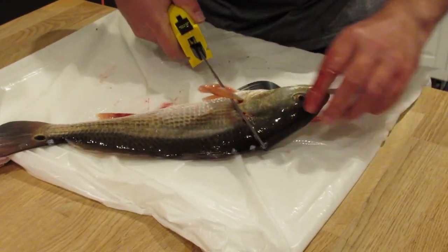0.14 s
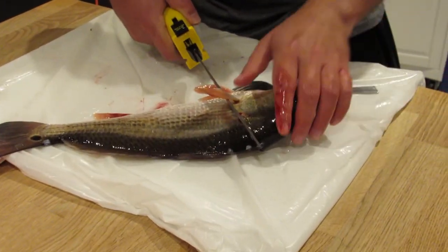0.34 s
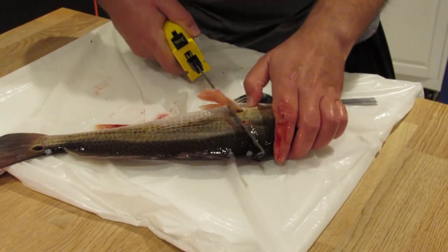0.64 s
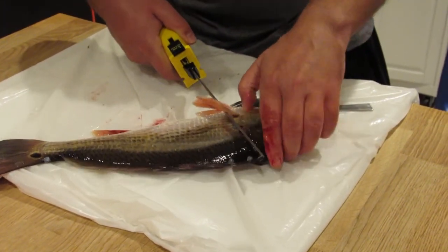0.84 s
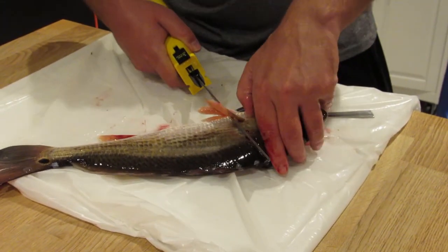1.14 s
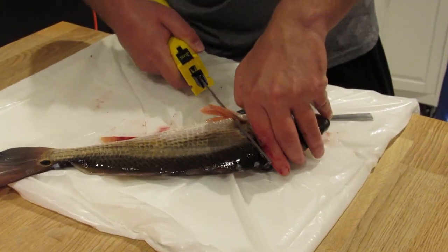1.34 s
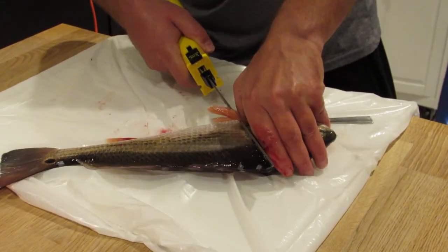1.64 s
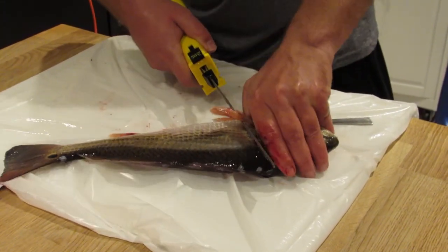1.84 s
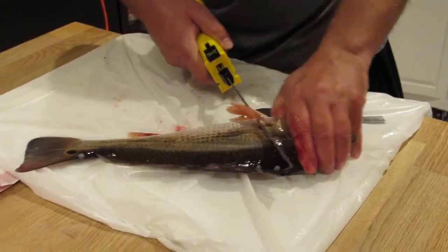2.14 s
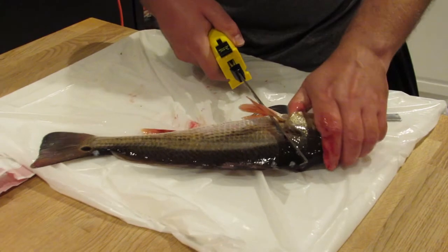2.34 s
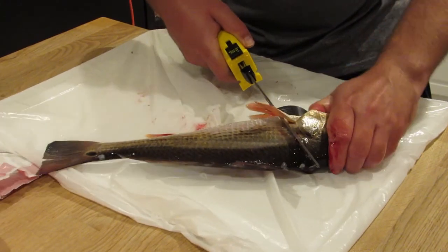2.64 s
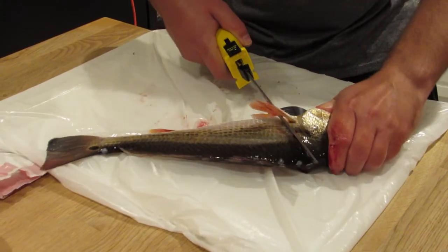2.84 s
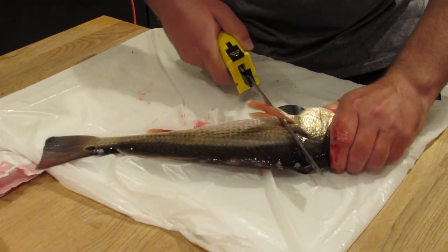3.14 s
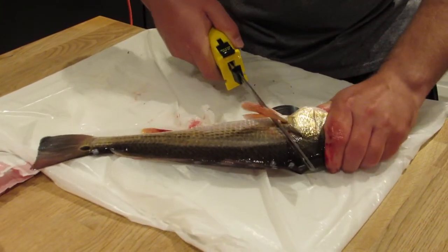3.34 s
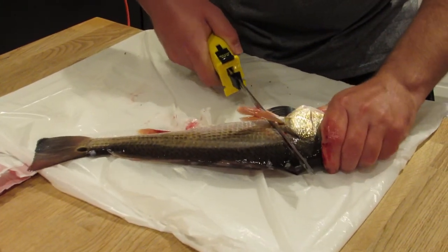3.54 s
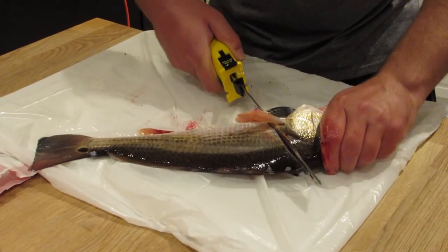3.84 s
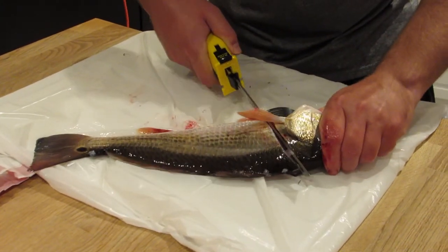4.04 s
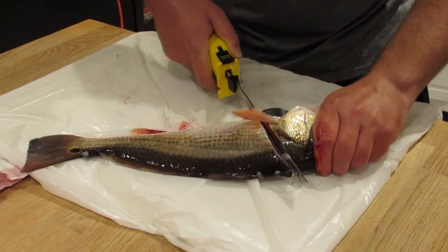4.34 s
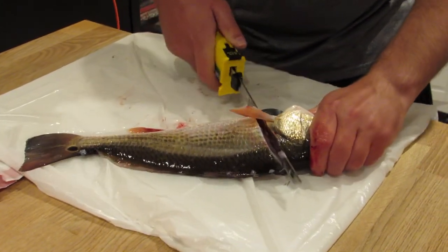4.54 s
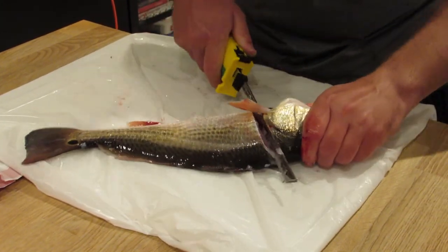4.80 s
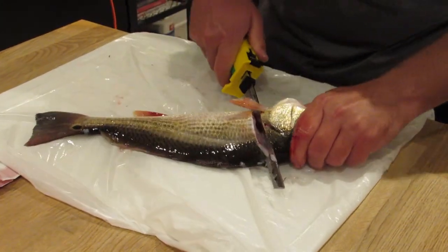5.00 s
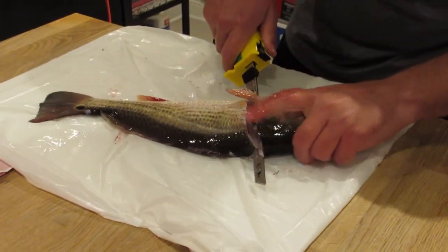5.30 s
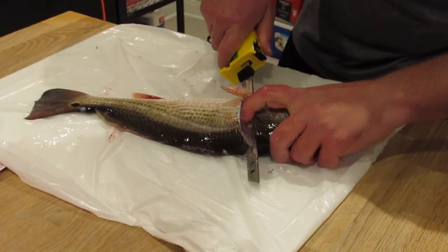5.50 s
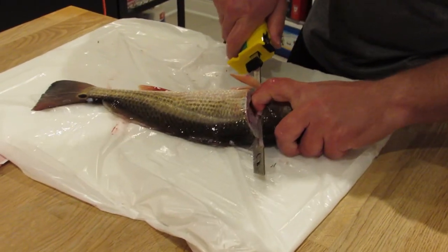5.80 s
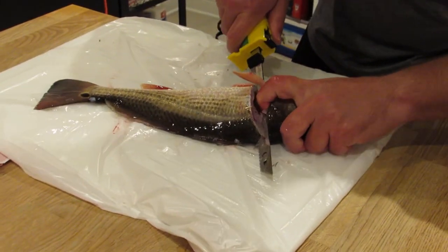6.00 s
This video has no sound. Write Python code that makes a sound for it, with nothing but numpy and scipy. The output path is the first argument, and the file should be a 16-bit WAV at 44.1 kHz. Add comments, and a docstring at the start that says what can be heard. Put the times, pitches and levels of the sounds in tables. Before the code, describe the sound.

Wet fish squelches and snaps, then an electric knife revs three times, rasps through bone and clatters to a stop.

```python
"""A corded electric knife coasts to a stop, is blipped three times through a fish, and coasts again.
Its motor whines, its brushes hiss, and gears and twin blades rattle in the plastic housing.
The pressed blades make the wooden counter drum. Between bursts the wet fish slides on a plastic
sheet, snaps and flops down. Ventilation and an appliance hum fill the small kitchen."""
import sys
import numpy as np
from scipy import signal
from scipy.fft import rfft, irfft, next_fast_len
from scipy.io import wavfile
from scipy.ndimage import uniform_filter1d, map_coordinates

SR = 44100
rng = np.random.default_rng(int(sys.argv[2]) if len(sys.argv) > 2 else 0)


def put_to_file(sound):
    """Save the sound as 16-bit audio at rate SR, in the file named by the first command-line argument."""
    columns = np.atleast_2d(sound).T  # one column per channel
    safe = np.clip(columns, -1, 1)
    whole_steps = np.round(safe * 32767)
    wavfile.write(sys.argv[1], SR, whole_steps.astype(np.int16))


N = 271656
TIME_S = np.arange(N) / SR
FULL_SPEED_HZ = 2990  # motor speed is the slot-passing rate
RIPPLE_HZ = 120  # torque pulses at twice the mains rate


def amp(db):
    """Decibels to gain."""
    return 10 ** (np.asarray(db) / 20)


def unit(x):
    """Scale to rms 1."""
    return x / np.sqrt(np.mean(x ** 2) + 1e-20)


def along(points, hz):
    """Interpolate (freq_hz, value) points on a log axis."""
    freq_hz, values = np.transpose(points)
    return np.interp(np.log(hz + 1), np.log(freq_hz + 1), values)


def curve(rows, **ends):
    """Interpolate (time_s, value) rows per sample."""
    return np.interp(TIME_S, *np.transpose(rows), **ends)


def wobble(rate_hz):
    """Smooth random curve with knots at rate_hz."""
    knots = rng.standard_normal(int(N * rate_hz / SR) + 4)
    return map_coordinates(knots, [TIME_S * rate_hz])


def filtered(x, response):
    """Apply a frequency response."""
    size = next_fast_len(N + SR // 2)
    return irfft(rfft(x, size) * response(np.fft.rfftfreq(size, 1 / SR)), size)[..., :N]


def shaped(x, spectrum):
    """Zero-phase filter from (freq_hz, gain_db) points."""
    return filtered(x, lambda hz: amp(along(spectrum, hz)))


def resonances(modes, hz):
    """Response of (centre_hz, width_hz, gain_db) modes."""
    return sum(amp(db) * 1j * hz * width / (centre ** 2 - hz ** 2 + 1j * hz * width)
               for centre, width, db in modes)


def impulse(spectrum, size=4096):
    """Minimum-phase impulse response of energy 1."""
    gain = amp(along(spectrum, np.fft.rfftfreq(size, 1 / SR)))
    cepstrum = irfft(np.log(gain + 1e-6))
    cepstrum[1:size // 2] *= 2
    cepstrum[size // 2 + 1:] = 0
    response = irfft(np.exp(rfft(cepstrum)))
    return response / np.linalg.norm(response)


def through(x, response):
    """Convolve with an impulse response."""
    return signal.fftconvolve(x, response)[:N]


def grains(rate_hz, spread_db):
    """Tiny random contacts of uneven size, rms 1."""
    size_db = spread_db * np.clip(rng.standard_normal(N), -2, 2)
    return unit((rng.random(N) < rate_hz / SR) * rng.choice([-1, 1], N) * amp(size_db))


def blows(rows, t60_s, scuff):
    """A sharp contact and a dying scuff per (start_s, level_db) row."""
    out, t = np.zeros(N + SR), np.arange(SR // 8) / SR
    for start_s, db in rows:
        blow = scuff * rng.standard_normal(len(t)) * amp(-60 * t / t60_s)
        blow[0] = 1
        out[int(start_s * SR):][:len(t)] += amp(db) * blow / np.linalg.norm(blow)
    return out[:N]


def slides(rows, attack_s=.018, t60_s=.28):
    """Attack-hold-release envelope of (start_s, length_s, level_db) rows."""
    return sum(np.clip((TIME_S - start_s) / attack_s, 0, 1)
               * amp(db - 60 * np.maximum(TIME_S - start_s - length_s, 0) / t60_s)
               for start_s, length_s, db in rows)


AIR_SPECTRUM = [(15, -54), (25, -19.5), (119, -5.5), (156, -10), (240, -8), (305, -5), (331, -10),
                (552, -7.5), (666, -40), (722, -20), (871, -14.5), (1620, -24), (2060, -24.5),
                (10600, -27.5), (15500, -42)]  # freq_hz, gain_db
AIR_COHERENCE = [(60, .5), (150, .8), (550, .85), (1650, .9), (10000, .9)]  # freq_hz, left_right_correlation
APPLIANCE_HUM = [(121, -64.5), (241, -56.5), (297, -61), (420, -63.5)]  # pitch_hz, level_db

def room_tone(air_db=-49):
    """Ventilation noise and a slightly unsteady appliance hum."""
    def mid_side(hz):
        angle = np.arccos(np.clip(along(AIR_COHERENCE, hz), -1, 1)) / 2
        return amp(along(AIR_SPECTRUM, hz)) * [np.cos(angle), np.sin(angle)]

    mid, side = filtered(rng.standard_normal((2, N)), mid_side)
    hum = sum(np.sqrt(2) * amp(db + wobble(5)) * np.sin(2 * np.pi * hz * TIME_S + .5 * wobble(5))
              for hz, db in APPLIANCE_HUM)
    return amp(air_db) * unit(np.array([mid + side, mid - side])) + hum


WALL_DECAY = [(150, 0.99), (1000, 0.61), (4000, 0.01), (14000, 0.54)]  # freq_hz, t60_s

def walls(x, delay_s=.004):
    """Diffuse reflections, each frequency dying at its own rate."""
    hz, t, noise = signal.stft(rng.standard_normal(SR // 2), SR, nperseg=256)
    decay = amp(-60 * t / along(WALL_DECAY, hz)[:, None])
    tail = signal.istft(noise * decay, SR, nperseg=256)[1]
    return through(x, np.pad(tail / np.linalg.norm(tail), (int(delay_s * SR), 0)))


SKIN_SLIDES = [(1.125, 0.018, -51), (1.52, 0.022, -51.5), (1.63, 0.067, -53.5), (1.72, 0.12, -50.5),
               (1.85, 0.12, -47.5), (2.066, 0.12, -48.5), (2.21, 0.12, -47), (2.366, 0.013, -35),
               (2.645, 0.059, -43.5), (2.8, 0.069, -43.5), (5.712, .025, -55.5), (5.83, 0.077, -55.5)]  # start_s, length_s, relative_db
SQUELCH_SPECTRUM = [(400, -30), (700, -14), (950, 2), (1330, -8), (1900, 0), (3000, -3), (5500, -6),
                    (10000, -5), (13000, -8), (15000, -11)]  # freq_hz, gain_db
WET_SNAPS = [(1.125, -33, -58), (1.632, -37, -46), (1.638, -33, -38), (1.776, -29, -35), (1.844, -31, -38),
             (1.914, -28, -50), (2.066, -17, -20), (2.072, -26, -19), (2.081, -27, -26), (2.089, -31, -38),
             (2.128, -30, -26), (2.353, -44, -36), (2.423, -43, -35), (2.555, -36, -43),
             (2.799, -34, -30.5), (2.824, -40, -38)]  # start_s, crack_relative_db, flesh_relative_db
CRACK_SPECTRUM = [(1000, -3), (4000, -2), (8000, 10.5), (15000, 6.5)]  # freq_hz, gain_db
FLESH_SPECTRUM = [(300, -5), (700, -11.5), (1000, 3), (1300, 0.5), (1800, 4.5), (2800, 2.5), (3600, -3),
                  (4800, 0), (7000, -32), (15000, -43)]  # freq_hz, gain_db
BONE_TAPS = [(1.547, -40), (1.764, -41), (1.9, -42), (1.932, -39), (2.002, -24.5), (2.682, -22),
             (2.69, -33), (2.749, -36), (2.787, -41)]  # start_s, relative_db
TAP_SPECTRUM = [(300, -32), (750, -13), (900, -6), (1000, 4), (1120, -7), (1350, -13), (1800, -4),
                (2600, -15), (6000, -24), (15000, -34)]  # freq_hz, gain_db
HEAD_FLOPS = [(2.354, -29), (2.374, -26), (2.386, -27), (2.402, -30.5), (2.42, -38)]  # start_s, relative_db
FLOP_SPECTRUM = [(35, -54), (60, -20), (241, 2.5), (414, -2), (547, -25), (1020, -11), (1120, -14),
                 (1460, -8), (1690, -25), (3000, -31), (3900, -46), (6600, -120)]  # freq_hz, gain_db

def fish():
    """Wet skin slides on plastic, the cut snaps open, idle blades tap bone, the head flops down."""
    crackle = unit(grains(rate_hz=1500, spread_db=5) + .55 * rng.standard_normal(N))
    crackle *= amp(1.8 * wobble(70)) * slides(SKIN_SLIDES)
    cracks = blows([(s, db) for s, db, _ in WET_SNAPS], t60_s=.018, scuff=.3)
    flesh = blows([(s, db) for s, _, db in WET_SNAPS], t60_s=.19, scuff=.15)
    taps = blows(BONE_TAPS, t60_s=.056, scuff=.08)
    flops = blows(HEAD_FLOPS, t60_s=.13, scuff=.3)
    return (amp(-1) * through(crackle, impulse(SQUELCH_SPECTRUM))
            + amp(10.5) * through(cracks, impulse(CRACK_SPECTRUM))
            + amp(15) * through(flesh, impulse(FLESH_SPECTRUM))
            + amp(12) * through(taps, impulse(TAP_SPECTRUM))
            + amp(21.5) * through(flops, impulse(FLOP_SPECTRUM)))


WOOD_MODES = [(60, 14, -5), (130, 10, 8), (176, 20, 3.5), (210, 22, 1), (241, 14, 2), (330, 110, -14)]  # centre_hz, width_hz, gain_db

def counter(strokes, power, press):
    """Pressed blades shove the wooden top twice a stroke, sway it once and pass on the motor's buzz."""
    reversals = np.diff(np.floor(2 * strokes), prepend=0).clip(0, 1)
    shoves = unit(reversals * amp(2 * wobble(90)))
    buzz = power * unit(np.sin(2 * np.pi * 2 * RIPPLE_HZ * TIME_S + .4 * wobble(15)))
    drum = filtered(shoves + 2.5 * rng.standard_normal(N),
                    lambda hz: resonances(WOOD_MODES, hz) * amp(along([(40, -12), (55, 0)], hz)))
    sway = np.sin(2 * np.pi * strokes) * amp(2.5 * wobble(24.6)) * press ** .28
    sway = shaped(sway, [(38, -24), (52, 0), (80, 0), (300, -60)])
    return press * (amp(-1) * unit(drum) + amp(-2) * buzz) + amp(-37.5) * sway


def stroke_swell(strokes, sharpness):
    """An uneven swell once a blade stroke, rms 1."""
    return unit(np.exp(sharpness * np.cos(2 * np.pi * strokes)) * amp(1.42 * wobble(70)))


SCRAPE_SPECTRUM = [(1500, -28), (3500, 4.5), (5000, 1.5), (7000, 2.5), (10000, 4.5), (12500, -0.5),
                   (15000, -4)]  # freq_hz, gain_db
BACKBONE_RASPS = [(4.1, 0.013, -23), (4.16, 0.25, -30.5)]  # start_s, length_s, level_db

def scrape(hiss_gain, strokes):
    """Brushes scrape and spark on the commutator; the same hiss swells as teeth rasp through bone."""
    sparks = grains(rate_hz=2500, spread_db=6)
    friction = unit(rng.standard_normal(N) + 1.25 * sparks) * stroke_swell(strokes, sharpness=.049)
    gain = np.hypot(hiss_gain, slides(BACKBONE_RASPS))
    return through(friction * gain, impulse(SCRAPE_SPECTRUM))


def rotor_tone(cycles, order):
    """One slot order, smeared into a narrow band by rotor chatter, rms 1."""
    rate_hz = 200 + 85 * order
    flutter = 1 + 1.2 * (wobble(rate_hz) + 1j * wobble(rate_hz))
    return unit(np.real(flutter * np.exp(2j * np.pi * order * cycles)) * amp(1.8 * wobble(30)))


MOTOR_CURRENT = [(250, -18), (700, -1.5), (1100, 0), (1400, 3), (2400, -2), (2750, -.5), (3000, -.5)]  # speed_hz, gain_db
MAGNETIC_ORDERS = [(1, -32.5), (2, -34.5), (3, -41), (4, -39.5), (6, -49)]  # slot_order, relative_db
SHELL_RADIATION = [(600, 0), (1000, 1.5), (1250, -3), (1500, 2), (1750, -5), (2100, -1.5), (2500, 1.5),
                   (2850, 6), (3150, 3), (3500, -4), (4300, -3), (5200, -6), (5800, -2), (6500, -7),
                   (7500, -7), (10000, -2), (15000, -6)]  # freq_hz, gain_db
WHISTLE_ORDERS = [(4, -9.5), (6, -10.5), (8, -12), (10, -15.5)]  # slot_order, re_hiss_db

def whine(hiss_gain, speed_hz, power, press, load):
    """Magnetic pull sings the low orders, most in spin-up; coasting brushes whistle the high ones."""
    waver = .006 + .005 * np.sqrt(press / press.max())
    cycles = np.cumsum(speed_hz * (1 + waver * wobble(200))) / SR
    ripple = unit(1 + .55 * np.cos(2 * np.pi * RIPPLE_HZ * TIME_S))
    current = power * ripple * amp(along(MOTOR_CURRENT, speed_hz))
    pull = sum(amp(db + along(SHELL_RADIATION, order * speed_hz)) * rotor_tone(cycles, order)
               for order, db in MAGNETIC_ORDERS)
    treble = lambda hz: np.interp(hz, [4000, 6000, 11500, 15000], [0, 1, 1, 0])
    whistle = sum(amp(db) * treble(order * speed_hz) * rotor_tone(cycles, order)
                  for order, db in WHISTLE_ORDERS)
    idle_pull = (1 - power) * .18 * (speed_hz / FULL_SPEED_HZ) ** 2
    whistle_gain = (1 - power) * hiss_gain * amp(-5 * load)
    return (current + idle_pull) * pull + whistle_gain * whistle


SLAP_LEVELS = [(1050, -59), (1350, -22), (2000, -23.5), (3000, -9)]  # speed_hz, relative_db
BLADE_KNOCKS = [(.572, -27), (0.605, -18), (.672, -17.5), (.710, -20), (0.751, -16.5), (0.8, -18.5),
                (.856, -17), (.922, -21), (1.027, -31.5), (2.905, -24), (2.922, -20), (2.936, -22),
                (3.080, -18), (3.177, -20), (3.250, -16), (3.349, -14), (3.381, -22), (3.416, -6.5),
                (3.433, -15), (3.453, -9), (3.473, -11), (3.536, -12.5), (3.583, -16), (3.611, -14.5),
                (4.097, -10), (4.795, -20), (4.843, -15.5), (4.899, -20.5), (4.927, -16.5), (4.964, -18),
                (4.994, -16), (5.032, -18.5), (5.073, -17.5), (5.126, -21.5), (5.183, -17.5), (5.276, -25)]  # snags and dying strokes: start_s, relative_db
SLAP_SPECTRUM = [(1400, 0), (2400, 3.5), (3200, 1), (4200, -12), (8000, -20)]  # freq_hz, gain_db
BOUNCE_SPECTRUM = [(1300, 0.5), (2000, 3), (3200, -25), (6000, -25)]  # freq_hz, gain_db

def blade_slaps(speed_hz, strokes, power, loose_db, taut_db=-1, bounce_s=.008, bounce_db=-4):
    """Blades cross their slack and hit once a stroke; each slap or knock has a duller bounce."""
    at = np.flatnonzero(np.diff(strokes % 1) < -.5)
    level_db = along(SLAP_LEVELS, speed_hz[at]) + np.where(power[at] > .5, taut_db, loose_db[at])
    level_db += 1.3 * rng.standard_normal(len(at))
    hits = list(zip(at / SR, level_db)) + BLADE_KNOCKS
    first = blows(hits, t60_s=.045, scuff=.11)
    bounce = blows([(s + bounce_s, db + bounce_db) for s, db in hits], t60_s=.045, scuff=.11)
    return amp(12.5) * (shaped(first, SLAP_SPECTRUM) + shaped(bounce, BOUNCE_SPECTRUM))


COAST_CHATTER = [(40, -67), (400, -52), (800, -44), (1500, -36), (2300, -31.5), (2900, -27)]  # speed_hz, level_db
POWERED_CHATTER = [(150, -52), (850, -28.5), (1400, -34.5), (1800, -28), (2300, -27), (3000, -24.5)]  # speed_hz, level_db

def gear_chatter(speed_hz, strokes, power, loose_db, press):
    """Gear teeth and blades chatter, louder with speed, power and pressure."""
    coasting = (1 - power) * amp(along(COAST_CHATTER, speed_hz) + loose_db)
    powered = power * amp(along(POWERED_CHATTER, speed_hz))
    bite = amp(-2.5) * press * power
    teeth = unit(grains(rate_hz=2500, spread_db=3.5) + .5 * rng.standard_normal(N))
    return teeth * stroke_swell(strokes, sharpness=.28) * np.hypot(coasting + powered, bite)


STEEL_MODES = [(1062, 26, 2), (1165, 28, 3), (1750, 90, -4), (2130, 90, -1), (2310, 150, -1),
               (2530, 70, -4)]  # centre_hz, width_hz, relative_db
STEEL_EXPOSURE = [(4.5, 0.2), (4.7, 0.84), (4.95, 1), (5.1, 0.52)]  # time_s, share

def steel_ring(contacts):
    """Bare steel rings once the blades are through the fish."""
    def response(hz):
        modes = resonances(STEEL_MODES, hz)
        return modes / np.sqrt(np.mean(abs(modes) ** 2))

    return amp(-2) * filtered(contacts * curve(STEEL_EXPOSURE), response)


HOUSING_MODES = [(440, -8, .08), (560, -11, .09), (628, -7, .12), (759, -2, .1), (860, -3, .08),
                 (955, -7, .08), (1062, -3, .09), (1165, -2, .08), (1390, 0, .06), (1470, -3, .06),
                 (1535, -1, .08), (1765, -6, .08), (2130, -6, .06), (2770, -6, .04)]  # pitch_hz, relative_db, t60_s

def housing(contacts, spectrum, ring_db):
    """The plastic shell colours contacts and rings with the blades."""
    t = np.arange(SR // 5) / SR
    ring = amp(ring_db) * sum(amp(db - 60 * t / t60_s) * np.cos(2 * np.pi * hz * t)
                              for hz, db, t60_s in HOUSING_MODES)
    ring[0] += 1  # direct path
    response = signal.fftconvolve(ring, impulse(spectrum))
    return through(contacts, response / np.linalg.norm(response))


FREE_SPECTRUM = [(59, -62), (100, -16), (176, -8.5), (380, -5.5), (436, 2), (475, -4.5), (630, -3.5),
                 (680, -10.5), (742, 2.5), (808, -2), (1160, 1.5), (1270, -5), (1450, -1.5), (1750, -6),
                 (2300, -5), (3200, -12), (3700, -18.5), (6000, -24), (7800, -47), (13200, -120)]  # freq_hz, gain_db
CUTTING_SPECTRUM = [(59, -40), (100, -48), (119, -17), (192, -9.5), (236, -8), (275, -5.5), (615, -11.5),
                    (693, -22.5), (768, -8), (960, -9), (1400, -2.5), (1840, -4.5), (2820, -7),
                    (3530, -14.5), (6000, -20), (7800, -30), (13200, -120)]  # freq_hz, gain_db

def rattle(chatter, slaps, load):
    """Chatter and slaps excite housing and steel; the chatter changes colour in the cut."""
    free = housing(chatter * np.sqrt(1 - load) + slaps, FREE_SPECTRUM, ring_db=-53.5)
    cutting = housing(chatter * np.sqrt(load), CUTTING_SPECTRUM, ring_db=-48)
    return free + cutting + steel_ring(chatter + slaps)


TRIGGER_PULLS = [(-2, -.102, .2, 2266, 0), (2.878, 2.988, .156, 2800, .4), (3.073, 3.355, .189, 4300, .9),
                 (3.614, 4.337, .249, 2522, .95), (6.136, 7, .129, 2600, 0)]  # on_s, off_s, spin_up_tau_s, braking_hz_per_s, release_phase_strokes
COAST_LOOSENESS = [(1.5, -5.5), (4.5, 0), (3, 0), (2, -7.5), (1, 0)]  # per pull: chatter_db, slap_db

def motor(drag_tau_s=9.716, slots_per_stroke=39.6):
    """Powered, the rotor nears full speed; released, friction and drag brake it."""
    speed_hz, strokes, power = np.zeros((3, N))
    loose_db = np.zeros((N, 2))
    for (on_s, off_s, spin_up_s, braking, phase), pull_db in zip(TRIGGER_PULLS, COAST_LOOSENESS):
        lag = np.exp(-np.clip(TIME_S - on_s, 0, off_s - on_s) / spin_up_s)
        driven_hz = FULL_SPEED_HZ + (np.interp(on_s, TIME_S, speed_hz) - FULL_SPEED_HZ) * lag
        drag = np.exp(-np.maximum(TIME_S - off_s, 0) / drag_tau_s)
        friction_hz = braking * drag_tau_s
        run_hz = np.maximum((driven_hz + friction_hz) * drag - friction_hz, 0)
        travel = np.cumsum(run_hz) / SR / slots_per_stroke
        now = TIME_S >= on_s
        speed_hz[now], power[now], loose_db[now] = run_hz[now], TIME_S[now] < off_s, pull_db
        strokes[now] = travel[now] - np.interp(off_s, TIME_S, travel) + phase
    return speed_hz, strokes, np.clip(uniform_filter1d(power, size=300), 0, 1), loose_db.T


BLADE_PRESSURE = [(2.9, -65), (2.934, -53.5), (3.334, -49.5), (3.43, -44), (3.564, -44), (3.958, -41),
                  (4.055, -30.5), (4.165, -26.5), (4.265, -36.5), (4.305, -26.5), (4.42, -41.5),
                  (4.5, -37.5), (4.72, -48)]  # time_s, relative_db
CUT_LOAD = [(2.8, 0.05), (2.89, 0.9), (4.38, 0.72), (4.52, 0.08)]  # time_s, share

def knife():
    """Motor speed, trigger, hand pressure and the load of the cut drive all parts."""
    speed_hz, strokes, power, (chatter_db, slap_db) = motor()
    press = amp(curve(BLADE_PRESSURE, left=-np.inf, right=-np.inf))
    load = curve(CUT_LOAD)
    hiss_gain = amp(-36) * speed_hz / 2000
    hiss = scrape(hiss_gain, strokes)
    chatter = gear_chatter(speed_hz, strokes, power, chatter_db, press)
    slaps = blade_slaps(speed_hz, strokes, power, slap_db)
    tones = whine(hiss_gain, speed_hz, power, press, load)
    return rattle(chatter, slaps, load) + hiss + tones + counter(strokes, power, press)


WALL_WIDTH = [(60, -6), (130, -15.5), (500, -15), (1000, -14), (2400, -26), (4500, -15), (8000, -11.5),
              (13000, -8)]  # freq_hz, side_db
BASS_BALANCE = [(130, 3.2), (260, 2.5), (500, 1.5), (1000, 0)]  # freq_hz, left_minus_right_db

def scene():
    """Knife and fish straight ahead; the walls widen the sound and the bass leans left."""
    direct = knife() + fish()
    reflections = shaped(walls(direct), [(200, -12), (700, 0)])  # less bass than the direct sound
    mid = amp(-.5) * direct + amp(-6.5) * reflections
    side = shaped(walls(direct), WALL_WIDTH)
    stereo = np.array([mid + side, mid - side]) + room_tone()
    return filtered(stereo, lambda hz: amp(np.outer([.5, -.5], along(BASS_BALANCE, hz))))


def record(dry):
    """Brick-wall low-pass at 15350 Hz."""
    return filtered(dry, lambda hz: hz < 15350)


dry = scene()
out = record(dry)
put_to_file(out)
```